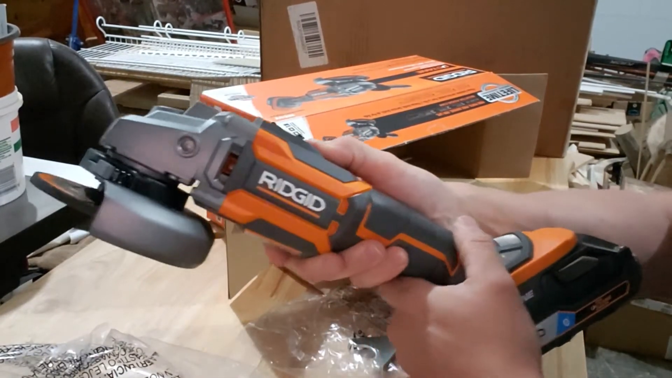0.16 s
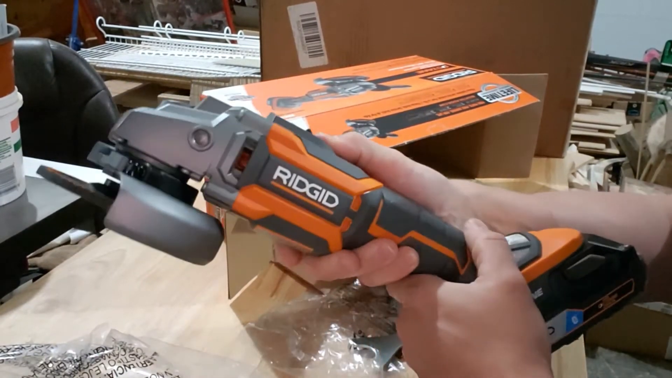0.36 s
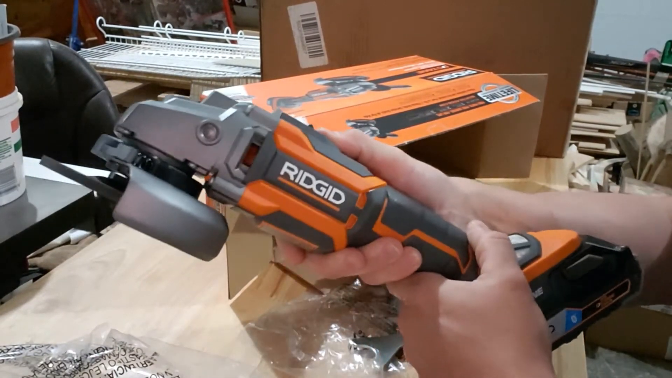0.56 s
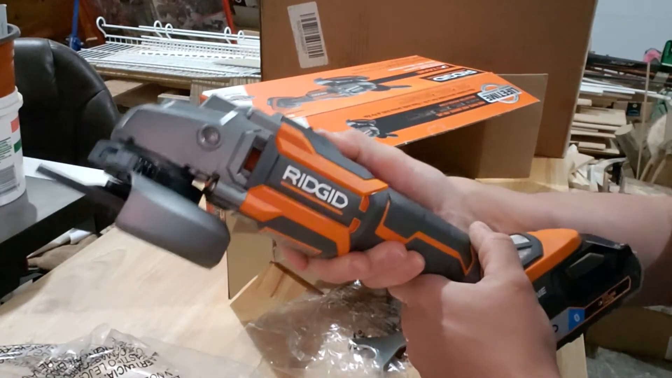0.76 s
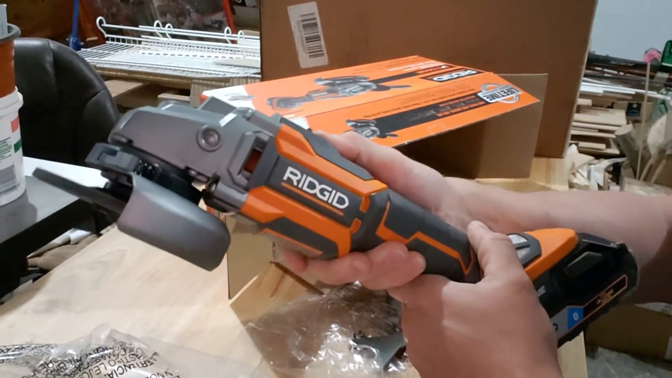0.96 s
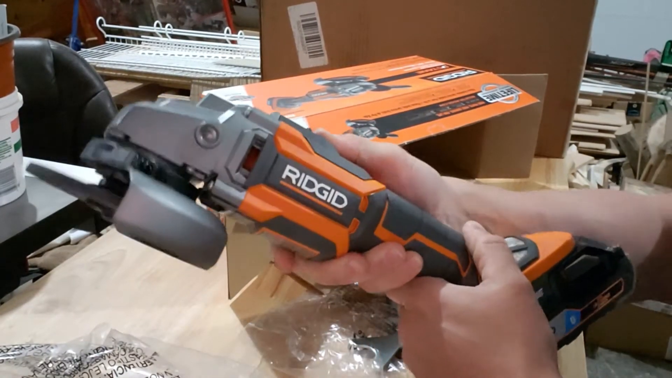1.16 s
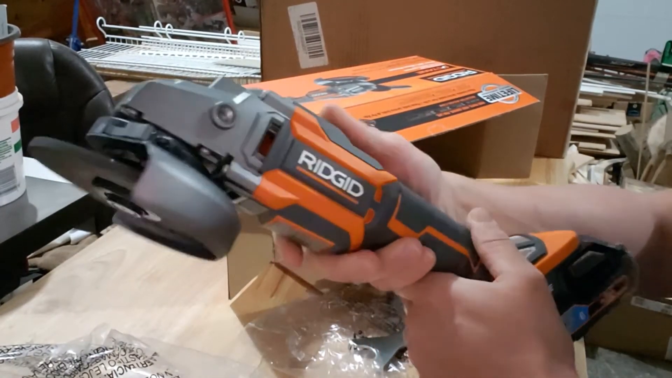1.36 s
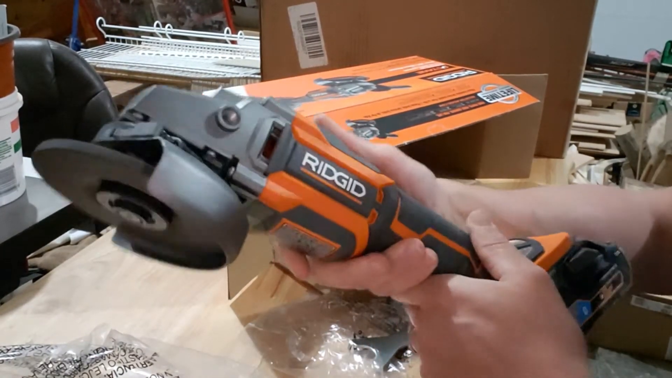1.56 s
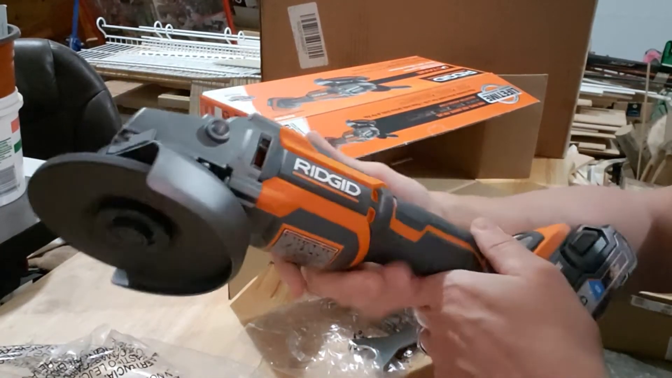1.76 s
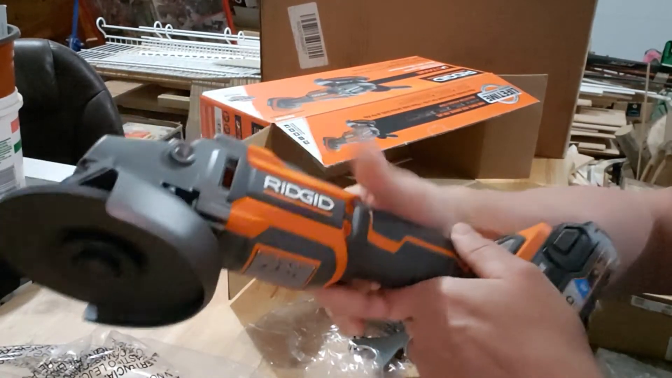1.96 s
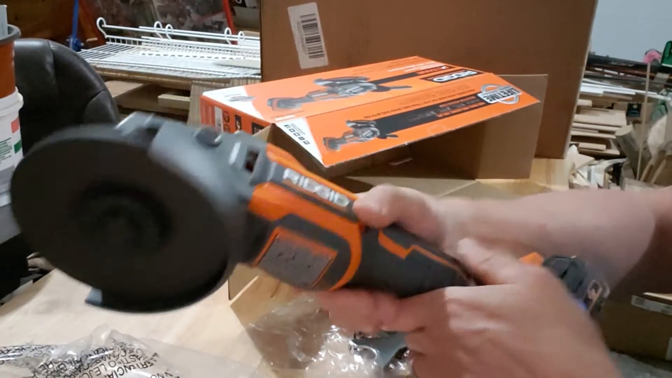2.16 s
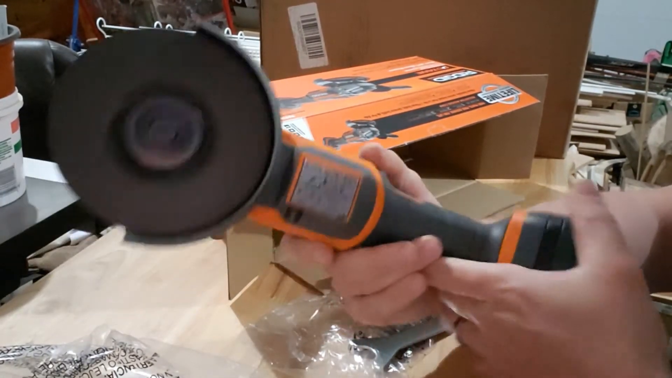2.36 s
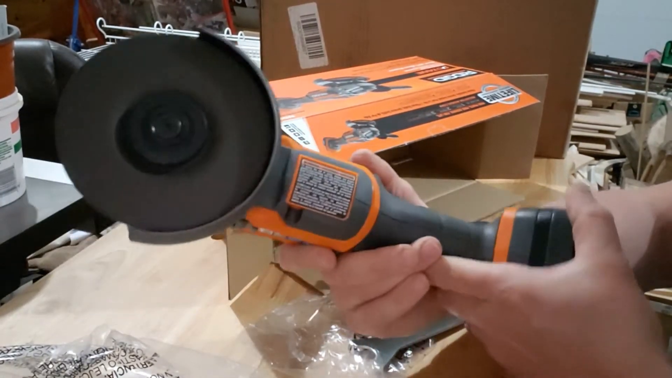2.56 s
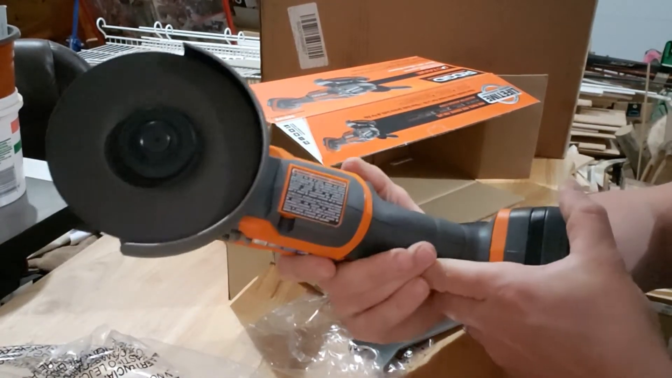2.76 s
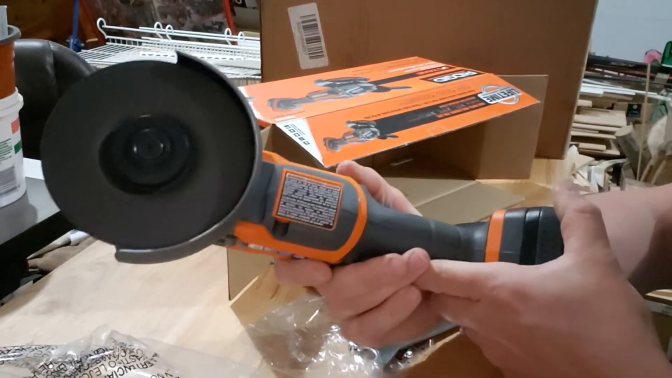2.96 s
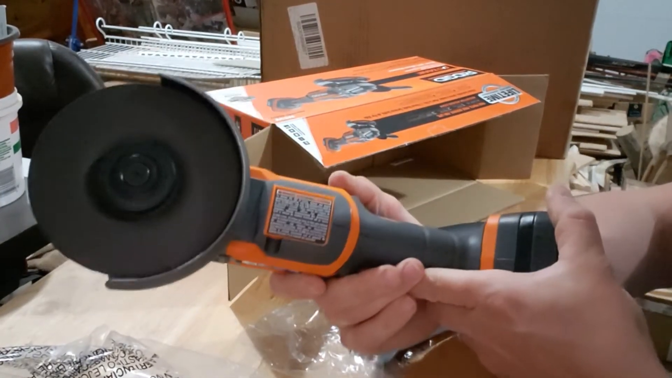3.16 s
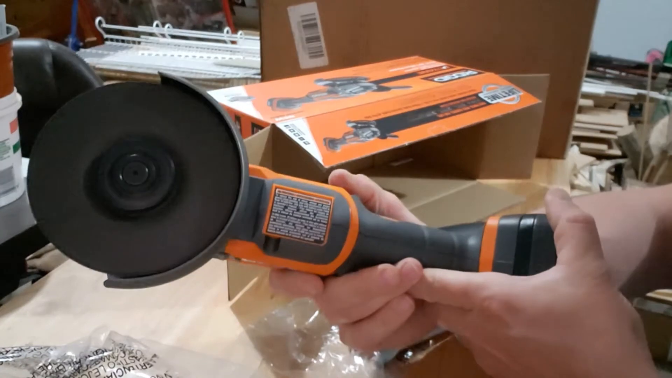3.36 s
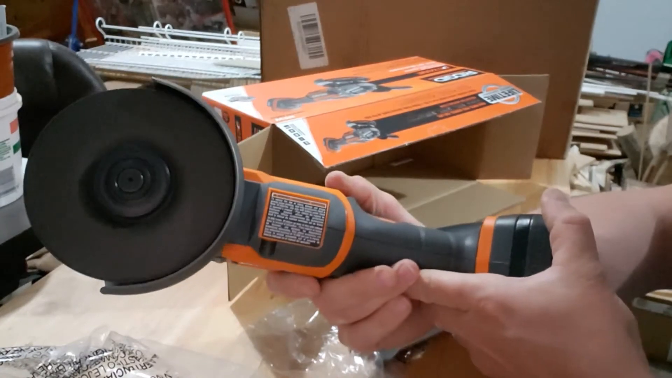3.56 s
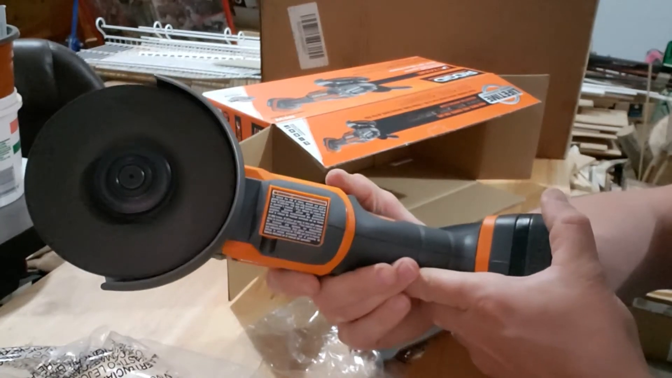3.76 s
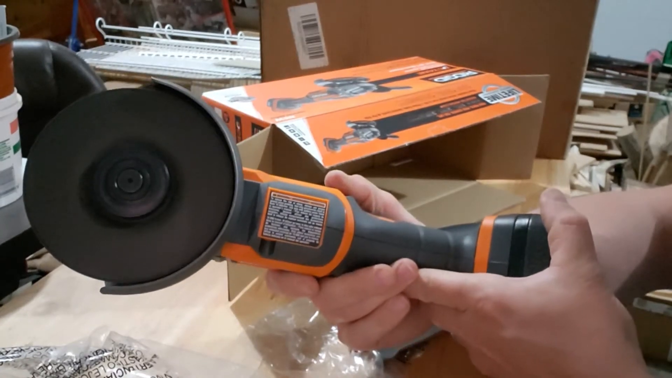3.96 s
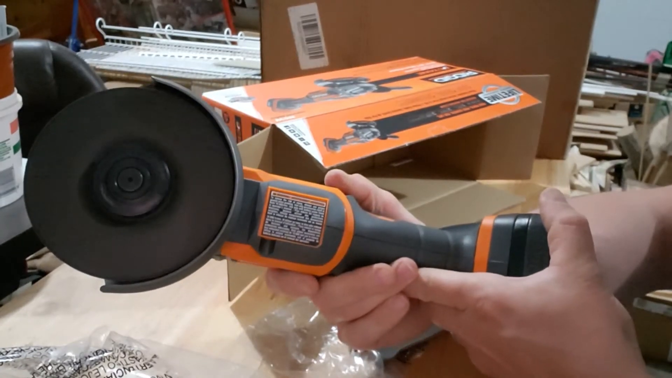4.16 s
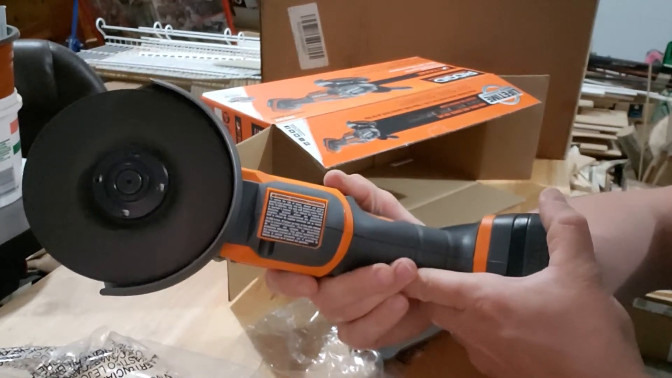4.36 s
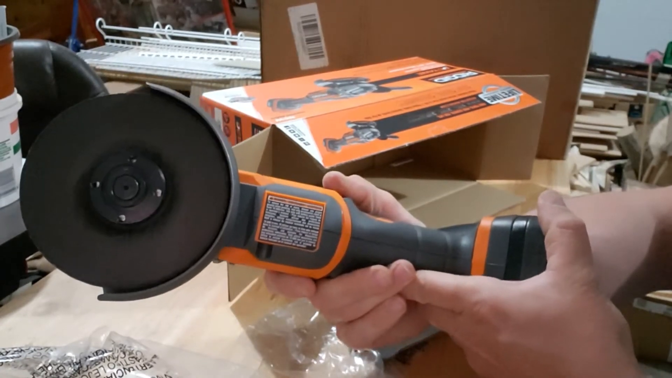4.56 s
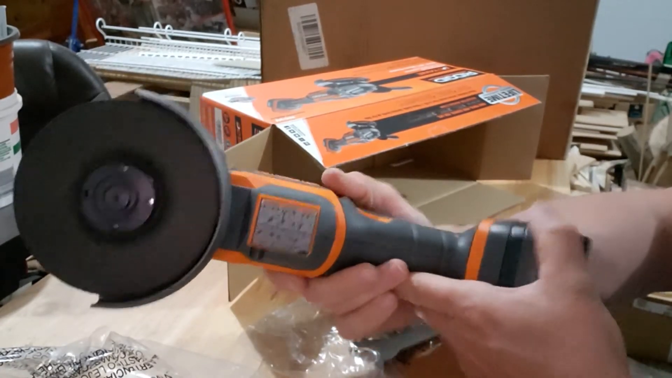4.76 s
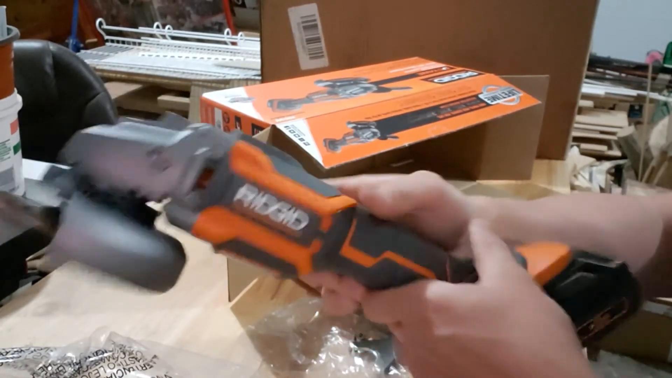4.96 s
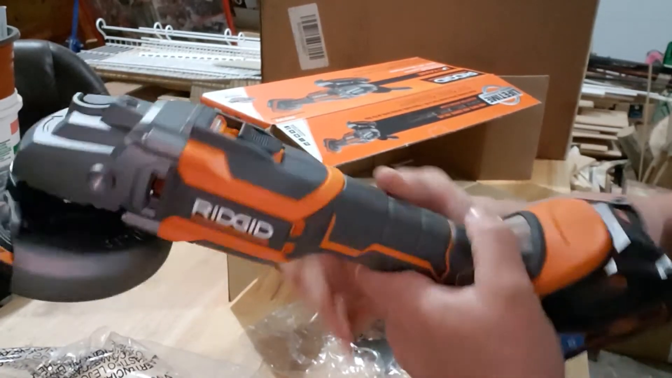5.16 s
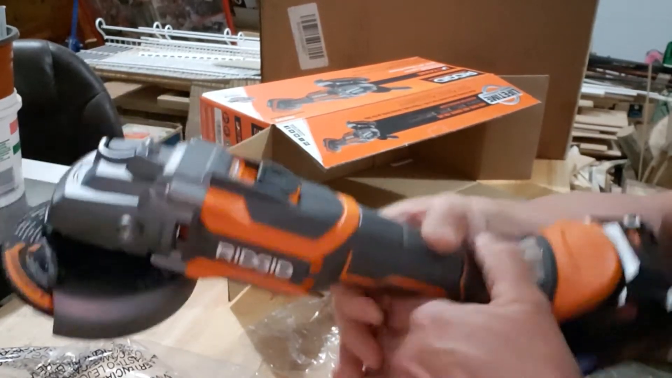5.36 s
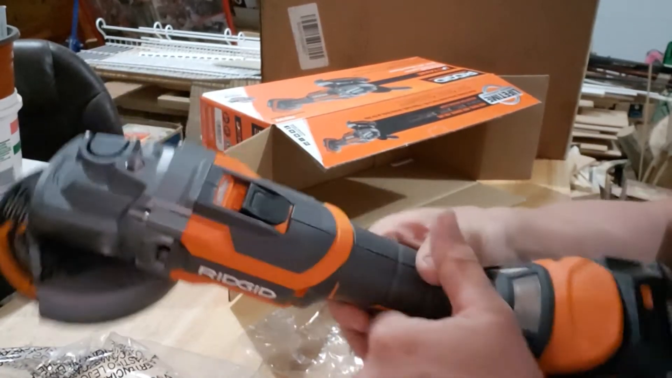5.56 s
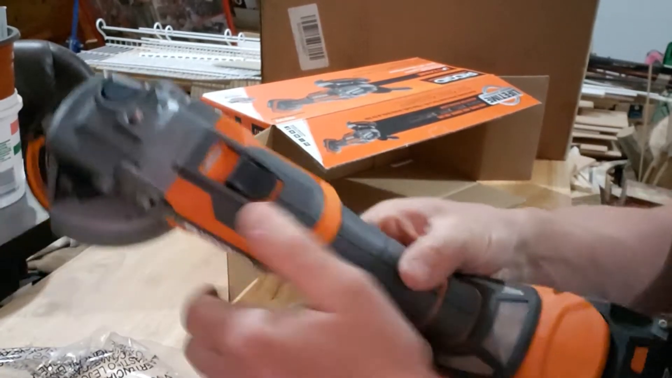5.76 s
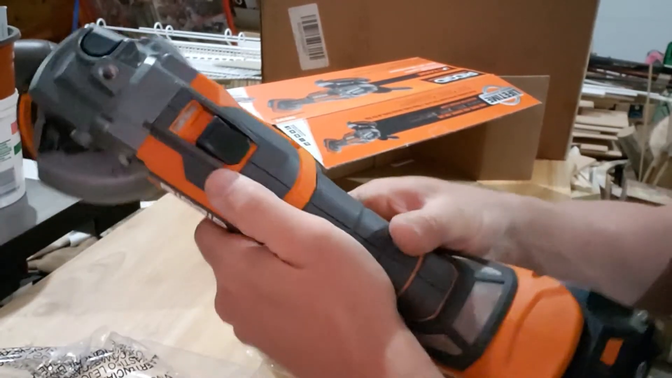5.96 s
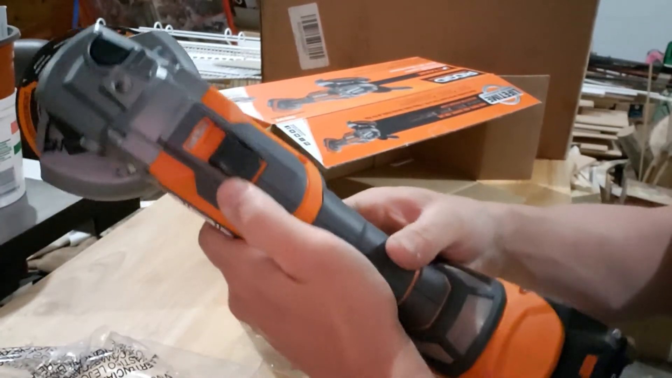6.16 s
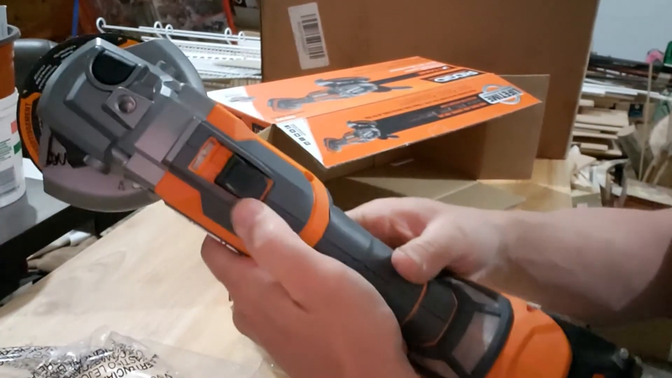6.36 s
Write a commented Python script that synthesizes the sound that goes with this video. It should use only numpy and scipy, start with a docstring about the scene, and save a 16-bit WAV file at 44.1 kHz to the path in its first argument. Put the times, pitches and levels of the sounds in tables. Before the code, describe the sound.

Close up in a workshop, a switch clicks, a small motor whirs up briefly, and a heavy disc clatters to rest before hands rub plastic.

```python
"""A workshop rumbles low and a hand brushes the casing of a cordless angle grinder held close to the
microphone pair, over a bench and a little to the right. The switch snaps, and filtered noise for the grinding
gears and shaft-locked sines for the whine climb for under a second. Then the disc coasts: chattering noise bursts
make the slack teeth rattle about a hundred times a second, and the heavy disc clacks on its flange once a turn.
The rattle fades, flares in a last shudder and ends in single knocks; hands then shift on the plastic."""
import sys
import numpy as np
from scipy import signal
from scipy.fft import rfft, irfft, next_fast_len
from scipy.io import wavfile
from scipy.ndimage import uniform_filter1d

SR = 44100
rng = np.random.default_rng(int(sys.argv[2]) if len(sys.argv) > 2 else 0)


def generate_wav(signal):
    """Clip the signal to [-1, 1] and save it as 16-bit WAV at the path in sys.argv[1]."""
    frames = np.transpose(np.atleast_2d(signal))
    scaled = np.clip(frames, -1, 1) * 32767
    pcm = np.round(scaled).astype(np.int16)
    wavfile.write(sys.argv[1], SR, pcm)


N = 283122
T = np.arange(N) / SR
SIZE = next_fast_len(N + SR)
FREQS = np.maximum(np.fft.rfftfreq(SIZE, 1 / SR), 1)
LEFT_RIGHT = np.array([[1], [-1]])

GEAR_RATIO = 3.4  # motor turns per disc turn
POLE_PAIRS = 3
RATTLE_PER_S, RATTLE_END_S = 105, 4.374
# disc speed at which part levels are given, and floor of the slowing (turns per s)
USUAL_SPEED, CRAWL_SPEED = 114.2, 26

# disc speed under drive: (t/s, speed/turns per s)
SPIN_UP = [(.55, 0), (.6, 12), (.7, 39.5), (.8, 62.5), (.9, 84), (1.1, 129), (1.15, 139), (1.2, 145),
           (1.25, 148)]
# radiating parts of the tool, from low to high [names]
PART_NAMES = ["body", "guard", "disc", "gear case", "crown wheel", "pinion"]
# hardest blows of tooth on tooth: (t/s, relative treble peak/dB)
BLOWS = [(1.2602, -14.5), (1.2765, -11), (1.386, -13), (1.4195, -16.5), (1.4282, -11), (1.4616, -15),
         (1.4806, -17.5), (1.488, -18), (1.541, -17.5), (1.5491, -14.5), (1.5604, -16), (1.569, -16),
         (1.577, -9), (1.5953, -13.5), (1.609, -15), (1.6454, -15), (1.665, -14), (1.674, -10.5),
         (1.682, -9), (1.693, -12), (1.7138, -13.5), (1.7216, -15), (1.755, -12.5), (1.7677, -13.5),
         (1.7777, -12.5), (1.7919, -11), (1.8254, -12.5), (1.8605, -14.5), (1.87, -12), (1.879, -14),
         (1.888, -18), (1.8939, -8.5), (1.9164, -13.5), (1.931, -15), (1.9707, -14), (1.9848, -21.5),
         (1.9971, -16), (2.027, -15), (2.047, -13), (2.0654, -11), (2.085, -19.5), (2.095, -16.5),
         (2.105, -16.5), (2.1183, -14.5), (2.1249, -20), (2.158, -20.5), (2.1658, -17), (2.2086, -17.5),
         (2.239, -22), (2.2735, -12.5), (2.2927, -16), (2.3062, -15), (2.318, -14), (2.3296, -20.5),
         (2.341, -12.5), (2.355, -14), (2.363, -11.5), (2.3845, -15.5), (2.4006, -17), (2.4116, -18),
         (2.437, -18.5), (2.45, -21), (2.5028, -19), (2.7245, -17), (2.9015, -20.5), (4.2525, -18.5),
         (4.268, -19.5), (4.2974, -26), (4.3113, -27)]
# resonances of disc, guard and gear case: (f/Hz, width/Hz, lift/dB before its share of use)
RINGS = [(365, 50, 4), (430, 40, 3), (835, 50, 7), (1180, 70, 3), (1660, 170, 6.5), (2175, 70, 8),
         (2290, 50, 3), (2670, 70, 4), (2960, 120, 3), (4450, 150, 3), (6030, 450, 7), (8880, 300, 7),
         (10300, 900, 5), (12850, 700, 6)]
# hard clacks of the disc on its flange: (t/s, relative peak/dB)
CLACKS = [(1.4093, -23), (1.4388, -34), (1.588, -19), (1.5956, -17), (1.6205, -16.5), (1.6356, -21),
          (1.6519, -17.5), (1.6852, -19), (1.6928, -16), (1.702, -16), (1.7343, -15), (1.7423, -15.5),
          (1.8022, -19.5), (1.8114, -16.5), (1.8189, -16.5), (1.8368, -15.5), (1.8456, -21.5), (1.872, -18),
          (1.8812, -17), (1.8893, -15.5), (1.9447, -16.5), (1.9635, -15), (1.9729, -20), (2.0105, -16.5),
          (2.0195, -18.5), (2.031, -21), (2.04, -17.5), (2.0585, -21.5), (2.1183, -16.5), (2.1387, -19.5),
          (2.1587, -21), (2.181, -27), (2.2547, -19), (2.2666, -14.5), (2.3, -15), (2.3466, -14),
          (2.3588, -20), (2.394, -14.5), (2.4193, -16.5), (2.4311, -20), (2.4684, -23.5), (2.4939, -15.5),
          (2.5206, -19.5), (2.5473, -15.5), (2.575, -19.5), (2.618, -20), (2.633, -19), (2.645, -20),
          (2.66, -16.5), (2.707, -38), (2.7539, -27.5), (2.8025, -21), (2.8196, -23), (2.8545, -26),
          (2.891, -28), (2.9285, -27), (2.967, -40), (2.9873, -21.5), (3.0284, -21), (3.243, -26.5),
          (3.7439, -28), (3.8738, -28.5), (3.9587, -29), (4.0644, -29), (4.1735, -30), (4.2236, -25),
          (4.2529, -22), (4.2584, -31), (4.2691, -27), (4.2778, -18), (4.2874, -21), (4.3005, -22.5),
          (4.322, -27), (4.339, -30), (4.3605, -33)]


def from_db(db):
    """Decibels to gain."""
    return 10 ** (np.asarray(db) / 20)


def rms_one(x):
    """Scale to unit power."""
    return x / np.sqrt(np.mean(x ** 2) + 1e-20)


def in_time(rows):
    """Each column of a curve at every sample."""
    s, *columns = np.transpose(rows)
    return [np.interp(T, s, column) for column in columns]


def gains(rows, fade=0.0091):
    """Gains from dB columns, silent outside their span; fade in s."""
    start, end = rows[0][0], rows[-1][0]
    gate = np.interp(T, [start - fade, start, end, end + fade], [0, 1, 1, 0])
    return [gate * from_db(db) for db in in_time(rows)]


def envelope(start, end, attack_s, release_s):
    """Gain that rises, holds and falls, at 20 dB per attack or release time."""
    before = np.maximum(start - T, 0) / attack_s
    after = np.maximum(T - end, 0) / release_s
    return from_db(np.maximum(-20 * (before + after), -200))


def at_hz(points, hz=FREQS):
    """Read a spectrum on a log-frequency axis."""
    points = np.array(points)
    return np.interp(np.log(hz), np.log(points[:, 0]), points[:, 1])


def lift_db(rings, hz):
    """How much a set of resonances lifts each frequency."""
    return sum(db / (1 + (2 * (hz - centre) / width) ** 2) for centre, width, db in rings)


def unit_power_db(db):
    """Shift a dB spectrum so that white noise keeps its power."""
    return db - 10 * np.log10(np.mean(from_db(db) ** 2))


def colour(x, db):
    """Causal (minimum-phase) filter with the given response."""
    cepstrum = irfft(np.log(from_db(np.maximum(db, db.max() - 100))), SIZE)
    # folding the cepstrum onto positive time makes the phase minimal
    cepstrum[1:SIZE // 2] *= 2
    cepstrum[SIZE // 2 + 1:] = 0
    return irfft(rfft(x, SIZE) * np.exp(rfft(cepstrum)), SIZE)[..., :N]


def drift(rate):
    """Unit-power random wander, drawn at `rate` points per s and joined by straight lines."""
    return rms_one(np.interp(T * rate, np.arange(N // 8), rng.standard_normal(N // 8)))


def stereo_noise():
    """White noise, partly alike at the two microphones, the treble arriving first on the right."""
    # (f/Hz, left-right likeness)
    likeness = [(60, .8), (160, .9), (300, .8), (640, .4), (1400, .7), (3100, .5), (6800, .45), (15000, .4)]
    # phase by which left leads right: (f/Hz, phase/radians)
    lead_points = [(0, 0.5), (950, 0.44), (2150, 0.85), (4820, 2), (5770, -4.5), (6290, -3.5), (10200, -24),
                   (16000, -33)]
    mid, side = rfft(rng.standard_normal((2, SIZE)))
    alike = np.clip(at_hz(likeness), 0, .98)
    lead = np.interp(FREQS, *np.transpose(lead_points))
    pair = np.sqrt(1 + alike) * mid + np.sqrt(1 - alike) * side * LEFT_RIGHT
    return irfft(pair * np.exp(.5j * lead * LEFT_RIGHT), SIZE)[:, :N] / np.sqrt(2)


def workshop(x, wet_db, t60=0.22, early_s=0.0045):
    """Close echoes from bench and boxes, then a short tail, as noise decaying at two rates."""
    t = T[:SR // 2]
    fading = (from_db(-60 * t / t60) + 2 * np.exp(-t / early_s)) * (t > .002)
    echoes = rms_one(rng.standard_normal((2, len(t))) * fading) / np.sqrt(len(t))
    wet = signal.fftconvolve(x * np.ones((2, 1)), echoes, axes=1)[:, :N]
    return (x + from_db(wet_db) * wet) / np.sqrt(1 + from_db(2 * wet_db))


def contacts(times, sizes, length_s):
    """Power of brief chattering contacts: each swells and dies, with area size squared."""
    power, age = np.zeros(N), np.arange(SR // 50) / SR / length_s
    np.add.at(power, np.clip((times * SR).astype(int), 0, N - 1), sizes ** 2)
    swell = age ** 4 * np.exp(-4 * age)
    return np.maximum(signal.oaconvolve(power, SR * swell / swell.sum())[:N], 0)


def room_rumble():
    """Low workshop rumble: coloured noise with a slowly moving level, stronger on the right."""
    # (f/Hz, relative level/dB)
    spectrum = [(15, -48.5), (25, -25), (54, -19), (87, -22), (168, -4), (233, -6), (259, -11.5),
                (279, -11.5), (340, -10), (377, -20), (425, -13), (517, -28.5), (900, -37.5), (1170, -64),
                (1980, -120)]
    # (t/s, level/dB before the left-right tilt)
    level_rows = [(0, -57), (1.7, -67.5), (2.3, -67), (3.9, -67), (4.3, -65), (6.42, -62)]
    level = from_db(in_time(level_rows)[0])
    return level * rms_one(colour(stereo_noise(), at_hz(spectrum))) * from_db([[-1], [1]])


def hands():
    """Skin sticks and slips on the plastic, each rub swelling and dying; the guard rings faintly."""
    # (t/s, rise and fall/s, relative hiss/dB, relative scuff/dB)
    rubs = [(.108, 0.053, -54.5, -77), (4.865, 0.025, -79, -70), (4.93, 0.049, -59.5, -79),
            (4.995, 0.038, -57, -76), (5.144, 0.05, -62, -82.5), (5.325, 0.012, -50.5, -72.5),
            (5.4, 0.046, -48, -74), (5.478, 0.037, -54.5, -64.5), (5.62, .09, -61, -81),
            (5.692, 0.021, -52, -76.5), (5.85, 0.051, -56, -68.5)]
    # colours of the two rubbing sounds: (f/Hz, relative level/dB)
    hiss_colour = [(4120, -37.5), (7000, -17), (8560, -21.5), (11700, 2), (13700, 5), (15200, 4),
                   (16000, -14.5)]
    scuff_colour = [(350, -13.5), (600, 0.5), (936, 1.5), (1010, -2.5), (1230, 2), (1680, -4.5), (3330, -2),
                    (4910, -4), (8000, -9), (10400, -62), (17600, -120)]
    slip_db, slips_per_s = 2.5, 170
    hiss, scuff = from_db(-76), from_db(-81.5)  # fingers at rest
    for s, length_s, hiss_db, scuff_db in rubs:
        rub = np.exp(-np.abs(T - s) / length_s)
        hiss = np.hypot(hiss, rub * from_db(hiss_db))
        scuff = np.hypot(scuff, rub * from_db(scuff_db))
    slips = stereo_noise() * from_db(slip_db * drift(slips_per_s))
    guard_db = lift_db([(1690, 110, 10)], FREQS)  # Hz, width Hz, lift dB
    hissing = hiss * rms_one(colour(slips, at_hz(hiss_colour)))
    scuffing = scuff * rms_one(colour(slips, at_hz(scuff_colour) + guard_db))
    return hissing + scuffing


def taps(level_db=-36, length_s=0.0018, usual_dull_db=-15, split_hz=4000):
    """The switch snaps on; later the casing ticks under the fingers, some ticks duller than others."""
    # (t/s, relative peak/dB, relative level of the dull part/dB)
    tap_rows = [(0.544, -8.5, -10.5), (4.859, -58, -15.5), (5.435, -39.5, -30), (5.483, -40, -30.5),
                (5.692, -42, -28), (5.839, -33.5, -29)]
    # (f/Hz, relative level/dB)
    tap_colour = [(180, -45), (300, -20), (1530, -21.5), (2000, -16), (3400, -3), (3830, -2.5), (6100, -6),
                  (7570, -21.5), (12500, -1), (16000, -2.5)]
    times, peak_db, dull_db = np.transpose(tap_rows)
    bright_db = peak_db + level_db
    low_db = bright_db + dull_db - usual_dull_db
    dull = stereo_noise() * np.sqrt(contacts(times, from_db(low_db), length_s))
    bright = stereo_noise() * np.sqrt(contacts(times, from_db(bright_db), length_s))
    low_pass = signal.butter(2, split_hz, "low", fs=SR, output="sos")
    high_pass = signal.butter(2, split_hz, "high", fs=SR, output="sos")
    snaps = signal.sosfilt(low_pass, dull) + signal.sosfilt(high_pass, bright)
    return workshop(colour(snaps, unit_power_db(at_hz(tap_colour))), wet_db=3.5)


def disc_speed():
    """Turns per second: driven up, then coasting to rest against air drag and bearing friction."""
    drag_per_s, stop_s = .19, 4.57
    off_s, top = SPIN_UP[-1]
    remaining = np.expm1(drag_per_s * np.maximum(stop_s - T, 0))
    coasting = top * remaining / np.expm1(drag_per_s * (stop_s - off_s))
    return np.where(T < off_s, in_time(SPIN_UP)[0], coasting)


def part_levels():
    """Gain of each part: a jolt, grinding under drive, then rattle; levels follow the disc speed."""
    # one row per part: (starting jolt/dB, under drive/dB, its slope/dB per doubling of speed,
    #  rattling/dB, its slope/dB per doubling of speed, speed where that levels off/turns per s, ring-out t60/s)
    part_rows = [(-42.5, -48, 5.5, -45.5, 3, 56, 0.37), (-24, -39.5, 1, -31.5, 7, 50.3, 0.45),
                 (-27.5, -29.5, -2, -24, 9, 66.7, 0.44), (-41.5, -31.5, 3, -28.5, 10.5, 140, 0.41),
                 (-45, -34, 3.5, -24.5, 13, 120, 0.32), (-33.5, -30.5, 6.5, -27, 13, 101, 0.37)]
    # jolt of starting: (full from t/s, full until t/s, attack/s per 20 dB, release/s per 20 dB)
    jolt_shape = (0.5936, .655, 0.049, 0.11)
    # rattle of the coasting disc: (full from t/s, full until t/s, attack/s per 20 dB)
    coast_shape = (1.38, 4.494, 0.19)
    # relative effort of the drive: (t/s, level/dB)
    effort_rows = [(.55, -15), (.6, -1), (.8, 2), (.95, -0.5), (1.02, 4.5), (1.27, 3.5), (1.45, -4.5),
                   (1.7, -32.5)]
    # the rattle swells and slackens, last in a shudder:
    # (t/s, half width/s, lift/dB, extra ring of the disc/dB, extra ring of the pinion/dB)
    surges = [(1.5, 0.15, -0.5, -1.5, 3.5), (1.82, 0.2, -2.5, 1, 5), (2.12, 0.058, 0, -1, 0),
              (2.22, 0.04, -2.5, -4, 3), (2.33, 0.19, 0, 0, 0), (2.62, 0.17, -1.16, 2, 0.5),
              (3.92, 0.27, -2, -0.5, 1.5), (4.261, 0.0086, 4.5, 3.5, -2.5), (4.288, 0.12, 13, -1.2, 8)]
    waver_db, waver_per_s = 1.0, 18  # random waver, shrinking below the usual speed
    speed = disc_speed()
    doublings = np.log2(np.hypot(speed, CRAWL_SPEED) / USUAL_SPEED)
    surge_db, disc_db, pinion_db = sum(
        np.outer(dbs, np.exp(-((T - s) / width) ** 2)) for s, width, *dbs in surges)
    surge_db = surge_db + waver_db * drift(waver_per_s) * np.minimum(speed / USUAL_SPEED, 1)
    extra_db = {"disc": disc_db, "pinion": pinion_db}
    jolt_gain, effort = envelope(*jolt_shape), gains(effort_rows)[0]
    levels = []
    for name, row in zip(PART_NAMES, part_rows):
        jolt_db, drive_db, drive_slope, rattle_db, rattle_slope, top_speed, t60 = row
        coast = envelope(*coast_shape, t60 / 3)
        speed_db = rattle_slope * np.minimum(doublings, np.log2(top_speed / USUAL_SPEED))
        rattle = coast * from_db(rattle_db + speed_db + surge_db + extra_db.get(name, 0))
        drive = effort * from_db(drive_db + drive_slope * doublings)
        jolt = jolt_gain * from_db(jolt_db)
        levels.append((T > SPIN_UP[0][0]) * np.sqrt(jolt ** 2 + drive ** 2 + rattle ** 2))
    return levels


def light_blows():
    """The teeth bounce across their play at a loosely steady rate between the hard blows."""
    scatter = .16  # share of the spacing
    marks = np.sort(np.r_[SPIN_UP[0][0], np.array(BLOWS)[:, 0], RATTLE_END_S])
    runs = []
    for a, b in zip(marks, marks[1:]):
        steps = max(round((b - a) * RATTLE_PER_S), 1)
        runs.append(np.linspace(a, b, steps + 1)[1:-1])
    times = np.concatenate(runs)
    return times + scatter * rng.standard_normal(len(times)) / RATTLE_PER_S


def last_knocks(count=7):
    """Times and sizes of the ever slower single knocks as the disc comes to rest, each bouncing once."""
    gap_s, slowing = .0265, 1.045
    knock_db = 5  # over the light blows
    bounce_s, bounce_db = .004, -3  # after and relative to the knock
    times = RATTLE_END_S + gap_s * (slowing ** np.arange(count) - 1) / (slowing - 1)
    sizes = np.repeat(from_db([knock_db, knock_db + bounce_db]), count)
    return np.r_[times, times + bounce_s], sizes


def tooth_repeats(x, teeth_per_turn=39.3, share=0.27, full_speed=85, count=3):
    """A blow runs on over the next teeth: delayed copies colour the rattle at multiples of the meshing rate."""
    speed = disc_speed()
    lag_s = 1 / (teeth_per_turn * np.maximum(speed, CRAWL_SPEED))
    carry = share * np.minimum(speed / full_speed, 1)
    repeats = 0
    for k in range(1, count):
        delayed = np.array([np.interp(T - k * lag_s, T, side) for side in x])
        repeats = repeats + carry ** k * delayed
    return (x + repeats) * np.sqrt(1 - carry ** 2)


def gear_train(crest_db=6.5, spread_db=2.5, limit_db=2.0, blow_rings=1.4):
    """Steady grinding and tooth blows shake the parts; each light blow favours different ones."""
    # edges of the ranges in which the named parts radiate [f/Hz]
    edges_hz = [150, 600, 1300, 3600, 8000, 11600, 17500]
    # how far tooth blows stand out in each part [level/dB]
    bite_db = (-2, -2, -4, -2, 6, 6)
    # play in the gears: (t/s, slack 0-1, single blows over the steady grinding/dB)
    play = [(.55, 0.04, -6), (1.0, 0.27, -24.5), (1.18, 0.55, -16), (1.35, 0.26, 0), (2.5, 0.64, 4.5),
            (3.6, 0.98, -6.5), (4.3, 0.65, 2.5), (4.41, 0.56, 0), (4.55, 0.43, 6), (4.62, .66, -19.5)]
    # colours of the gears under drive and when slack: (f/Hz, relative level/dB)
    driven_colour = [(150, -25), (200, -22.5), (280, -10.5), (420, -27.5), (560, -5.5), (720, -13.5),
                     (1140, -4.5), (2600, 4), (3200, 7), (4400, -1.5), (7300, -5.5), (9300, -23),
                     (11500, -6.5), (14000, -1), (15700, -11.5)]
    slack_colour = [(150, -19), (230, -21), (350, 0.5), (540, 1), (640, -10.5), (900, -5), (1250, -3.5),
                    (1700, 4.5), (2500, -1.5), (5200, -9), (6200, -3), (8100, -12.5), (9900, -4),
                    (11300, -6.5), (13500, -1), (15700, -8.5)]
    own_db = (2.5, 2.5, 4.0, 2.0, 2.5, 2.0)  # each part's own spread of the light blows
    contact_s = (.0024, .0022, .002, .0017, .0017, .0017)
    slack, blows_db = in_time(play)
    slack = np.clip(slack, 0, 1)
    levels = part_levels()

    # hard blows are sized against the treble of the moment
    treble = np.hypot(*levels[-2:]) + 1e-6
    hard_s, peak_db = np.transpose(BLOWS)
    hard = np.minimum(from_db(peak_db - crest_db) / np.interp(hard_s, T, treble), 3)
    light_s = light_blows()
    knock_s, knocks = last_knocks()
    times = np.r_[light_s, hard_s, knock_s]
    chance = rng.standard_normal((len(light_s), len(edges_hz)))  # last column is common to all parts

    rings_db = lift_db(RINGS, FREQS)
    slack_db = at_hz(slack_colour)
    driven = colour(workshop(stereo_noise(), wet_db=2.5), at_hz(driven_colour))
    grinding = colour(workshop(stereo_noise(), wet_db=-4.5), slack_db + rings_db)
    chatter, parts = stereo_noise(), []
    for k, edges in enumerate(zip(edges_hz, edges_hz[1:])):
        band = signal.butter(7, edges, "band", fs=SR, output="sos")
        steady = np.sqrt(1 - slack) * rms_one(signal.sosfilt(band, driven))
        steady = steady + np.sqrt(slack) * rms_one(signal.sosfilt(band, grinding))
        # the play of the teeth limits how hard a light blow can be
        light_db = np.minimum(spread_db * chance[:, -1] + own_db[k] * chance[:, k], limit_db)
        sizes = np.r_[from_db(light_db), hard, knocks]
        blows = contacts(times, sizes, contact_s[k]) / RATTLE_PER_S
        force = from_db(blows_db + bite_db[k]) * np.sqrt(blows)
        # struck parts ring more clearly than rubbed ones
        struck = colour(workshop(chatter * force, wet_db=-6.0), slack_db + blow_rings * rings_db)
        struck = rms_one(signal.sosfilt(band, struck))
        part = steady + struck * np.sqrt(np.mean(force ** 2))
        # blows and grinding share the part's power
        power = uniform_filter1d(uniform_filter1d(part.mean(0) ** 2, size=2800), size=1800)
        parts.append(part / np.sqrt(np.maximum(power, 1e-9)) * levels[k])
    body, guard, disc, gear_case, crown_wheel, pinion = parts
    return body + guard + pinion + tooth_repeats(disc + gear_case + crown_wheel)


def whine(flutter=0.0015, tooth_error=0.3, carrier_hz=10060):
    """Tones of teeth and poles, locked to the motor shaft, flare at each resonance they sweep through."""
    # (multiple of motor speed, relative level/dB, full from t/s, full until t/s, attack/s per 20 dB,
    #  release/s per 20 dB, roughness 0-1, share of the tooth scatter)
    tone_rows = [(12, -31, .67, .97, .09, .27, .2, 1.0), (15, -37.5, .675, .81, .09, .25, .2, .8),
                 (10, -43, .7, 1.0, .07, .3, .3, .8), (18, -42, .66, .8, .07, .3, .3, .8),
                 (24, -43, .82, .99, .2, .25, .7, 1.6), (6, -35, 1.08, 1.26, .22, .5, .2, 0),
                 (12, -43, 1.22, 1.42, .15, .3, .6, 0), (3, -33.5, 1.01, 1.13, .12, .06, .24, 0)]
    # (f/Hz, width/Hz, lift/dB)
    flares = [(1580, 230, 16.5), (2340, 330, 9.5), (2965, 120, 9), (3170, 560, 10.5), (4380, 400, 2),
              (5950, 600, 9), (8100, 500, 4)]
    # tone of the speed controller: (relative level/dB, full from t/s, full until t/s,
    #  attack/s per 20 dB, release/s per 20 dB)
    switching_tone = (-37.5, .74, .86, .3, .07)
    scatter_turns = .011  # unevenness of the meshing at 100 disc turns per s (motor turns)
    speed = disc_speed()
    turns = GEAR_RATIO * np.cumsum(speed * (1 + flutter * drift(160))) / SR
    scatter = scatter_turns * (speed / 100) ** 3 * drift(700)  # teeth meet less evenly at speed
    off_centre = tooth_error * np.cos(2 * np.pi * turns)       # the pinion runs slightly off centre
    tones = 0
    for order, db, *shape, rough, slip in tone_rows:
        angle = 2 * np.pi * order * (turns + slip * scatter)
        tone = np.sin(angle) * (1 + rough * drift(160)) + np.cos(angle) * rough * drift(220)
        flare_db = lift_db(flares, order * GEAR_RATIO * speed)
        tones = tones + tone * (1 + slip * off_centre) * envelope(*shape) * from_db(db + flare_db)
    # the soft start chops the current: a thin sideband climbs with the commutation rate
    chopper_db, *chopper_shape = switching_tone
    chopper = np.sin(2 * np.pi * (carrier_hz * T + POLE_PAIRS * turns))
    chopper = from_db(chopper_db) * envelope(*chopper_shape) * chopper
    return workshop(np.sqrt(2) * (tones + chopper) * (speed > 0), wet_db=-9.0)


def growl():
    """While the motor gathers speed, its torque pulses once per commutation and shakes the gears."""
    # (depth 0-1, full from t/s, full until t/s, attack/s per 20 dB, release/s per 20 dB)
    pulsing = (.4, .61, .7, .07, .35)
    depth = pulsing[0] * envelope(*pulsing[1:])
    angle = 2 * np.pi * POLE_PAIRS * GEAR_RATIO * np.cumsum(disc_speed()) / SR
    return (1 + depth * np.sin(angle)) / np.sqrt(1 + depth ** 2 / 2)


def disc_hum(rough=0.37, waver_db=2.5, attack_s=0.17, release_s=0.3):
    """The unbalanced disc pushes the air once a turn; spindle and bearing add unsteady overtones."""
    # (t/s, level/dB before its waver)
    wobble_rows = [(.84, -65), (.95, -52), (1.08, -43.5), (1.22, -47), (1.55, -50), (1.8, -57.5),
                   (2.05, -62), (2.38, -74), (2.48, -87)]
    # (multiple of the disc speed, level/dB before its roughness, full from t/s, full until t/s)
    hum_orders = [(2, -47, 1.1, 1.27), (2.5, -48, 1.0, 1.12), (2.5, -52, 1.65, 1.93),
                  (3, -47.5, 1.05, 1.25), (4, -45.5, 1.15, 1.45)]
    angle = 2 * np.pi * np.cumsum(disc_speed()) / SR
    hum = gains(wobble_rows, fade=0.036)[0] * from_db(waver_db * drift(17)) * np.sin(angle)
    for order, db, start, end in hum_orders:
        level = from_db(db) * envelope(start, end, attack_s, release_s)
        hum = hum + level * np.sin(order * angle) * (1 + rough * drift(25))
    return np.sqrt(2) * hum


def turn_clacks():
    """Times and relative levels of lighter clacks, spaced about a turn apart between the hard ones."""
    start, end = 1.3, 3.25  # s
    over_disc_db, spread_db = 7.0, 1.5  # peak over the level of the disc, before the common lift
    turns = np.cumsum(disc_speed()) / SR
    mark_s = np.sort([start, end] + [s for s, _ in CLACKS if start < s < end])
    marks = np.interp(mark_s, T, turns)
    runs = []
    for a, b in zip(marks, marks[1:]):
        runs.append(np.linspace(a, b, max(round(b - a), 1) + 1)[1:-1])
    times = np.interp(np.concatenate(runs), turns, T)
    disc_level = part_levels()[PART_NAMES.index("disc")]
    disc_db = 20 * np.log10(np.interp(times, T, disc_level))
    return times, disc_db + over_disc_db + spread_db * rng.standard_normal(len(times))


def disc_clacks(length_s=0.0016, clack_db=3.5):
    """The turning disc is thrown against its flange, now lightly, now hard, and rings briefly."""
    # (f/Hz, relative level/dB)
    clack_colour = [(170, -36), (350, -11.5), (560, -18), (900, -13.5), (1250, -7), (1550, 2), (2000, 3.5),
                    (2550, -2), (3300, -6.5), (5000, -15), (16000, -34.5)]
    times, peak_db = np.hstack([np.transpose(CLACKS), turn_clacks()])
    force = np.sqrt(contacts(times, from_db(peak_db + clack_db), length_s) * length_s)
    shape_db = unit_power_db(at_hz(clack_colour) + .5 * lift_db(RINGS, FREQS))
    return colour(workshop(stereo_noise() * force, wet_db=-10), shape_db)


def swell_and_sink(x):
    """Narrow ranges of the grinder's sound swell and sink for a moment, each at its own time."""
    # (t/s, half width/s, f/Hz, width/Hz, lift/dB)
    swells = [(1.1, .2, 10300, 900, -4), (1.5, .1, 10350, 800, 3), (1.675, .035, 9800, 900, 6),
              (1.45, .2, 8880, 500, -5), (1.85, .13, 8800, 450, 5), (1.92, .18, 10600, 1500, -5),
              (1.85, .17, 12850, 700, 6), (2.09, .05, 12900, 700, 4), (2.35, .08, 10300, 900, 3),
              (2.38, .1, 12900, 700, 3), (2.8, .5, 8880, 400, -5), (2.75, .06, 10200, 900, 4),
              (2.9, .4, 12950, 500, 3), (1.85, .25, 2450, 400, 3), (2.8, .45, 2450, 200, -6),
              (2.6, .3, 2720, 250, 4), (4.3, .15, 6000, 600, -4), (4.3, .15, 2550, 350, -5),
              (4.3, .2, 3200, 900, -3), (4.3, .15, 1640, 250, 3), (4.3, .15, 2200, 150, 3),
              (4.3, .2, 820, 200, 3), (.62, .1, 660, 200, -4)]
    for s, length_s, hz, width_hz, db in swells:
        band = signal.lfilter(*signal.iirpeak(hz, hz / width_hz, fs=SR), x)
        x = x + band * (from_db(db * np.exp(-((T - s) / length_s) ** 2)) - 1)
    return x


def after_ring():
    """The last knocks leave the steel guard ringing faintly, as decaying sines."""
    # (f/Hz, starting level/dB, t60/s)
    modes = [(2180, -59, .2), (3030, -70, .45), (4290, -73, .5), (4375, -69.5, .52), (4440, -73, .45)]
    out, first = np.zeros((2, N)), int(RATTLE_END_S * SR)
    for s in last_knocks()[0]:
        age = np.maximum(T[first:] - s, 0)
        for hz, db, t60 in modes:
            ring = np.sin(2 * np.pi * (hz * age + rng.random((2, 1))))
            out[:, first:] += (age > 0) * from_db(db - 60 * age / t60) * ring
    return out


def lean_right(x):
    """Place the grinder a little to the right by a level difference at each frequency."""
    # (f/Hz, left minus right/dB)
    lean_points = [(60, -6.5), (99, -6), (160, -2.5), (270, -3), (450, -4), (740, -7), (1220, -2.5),
                   (2010, -1), (3330, -1.5), (5500, 0.5), (9080, -6.5), (15000, -4.5)]
    lean = from_db(at_hz(lean_points) / 2 * LEFT_RIGHT)
    return irfft(rfft(x, SIZE) * lean / lean.mean(0), SIZE)[:, :N]


def scene(hands_db=-0.5):
    """The grinder and the hands on it are a little to the right, over the low rumble of the room."""
    handling = from_db(hands_db) * hands() + taps()
    gears = swell_and_sink(gear_train() * growl() + disc_clacks())
    grinder = gears + whine() + disc_hum() + after_ring()
    return room_rumble() + lean_right(handling + grinder)


def record(dry):
    """Peaks are clipped at full scale, then the top is cut steeply."""
    cutoff_hz = 15850
    low_pass = signal.ellip(10, .1, 80, cutoff_hz, fs=SR, output="sos")
    return signal.sosfilt(low_pass, np.clip(dry, -1, 1))


dry = scene()
out = record(dry)
generate_wav(out)
```